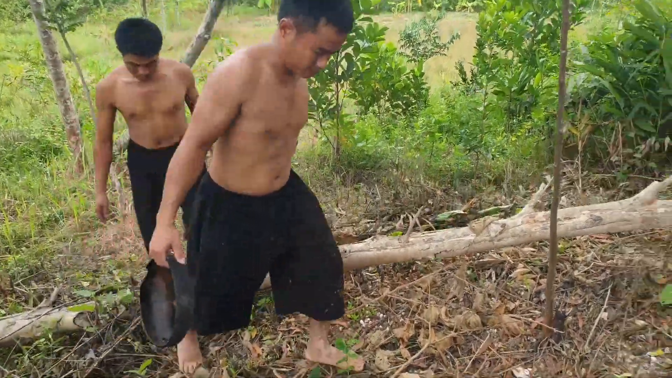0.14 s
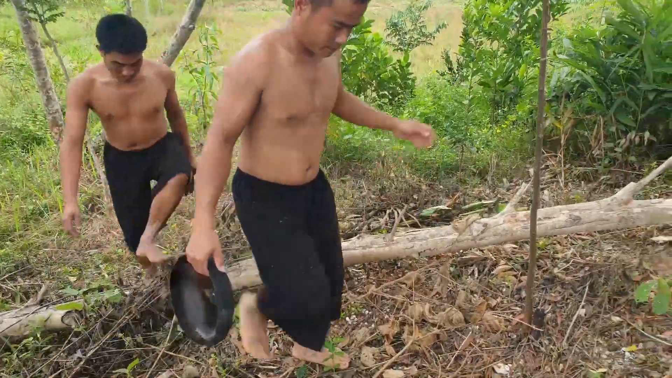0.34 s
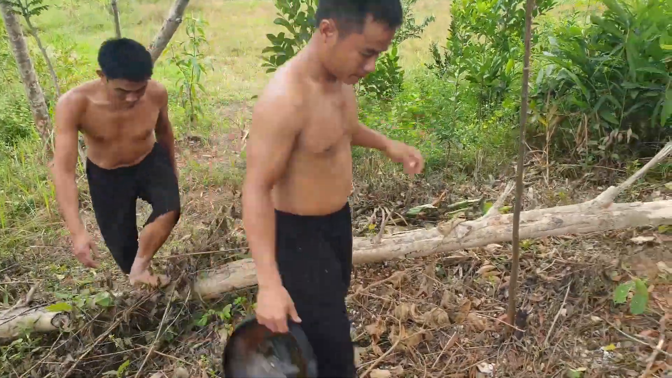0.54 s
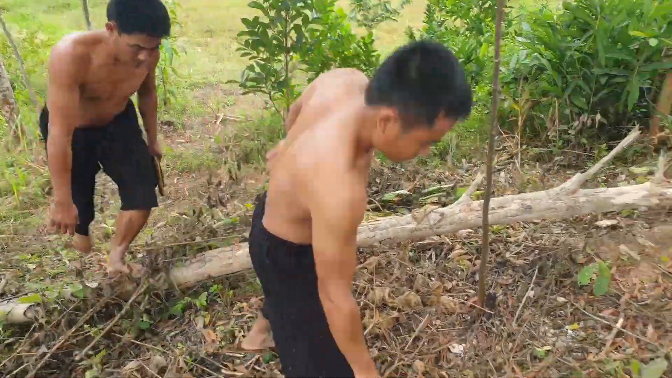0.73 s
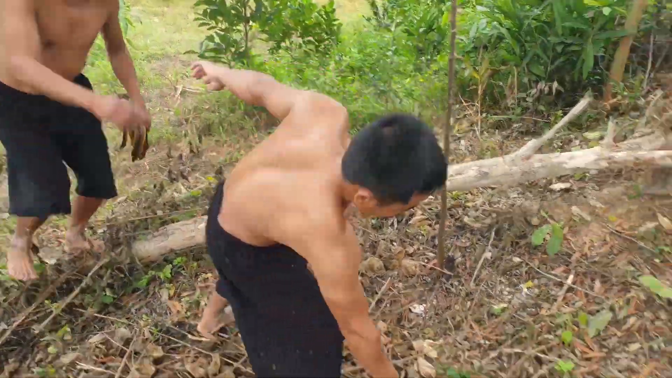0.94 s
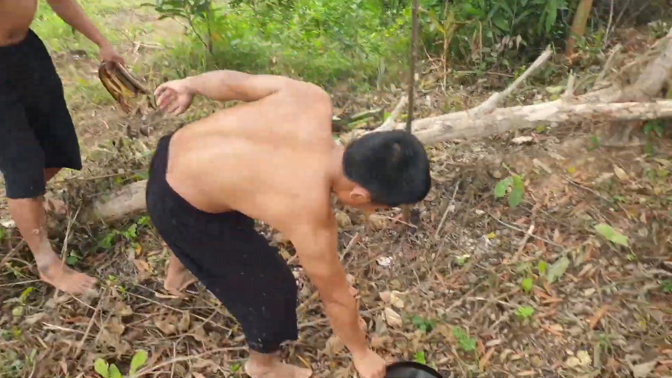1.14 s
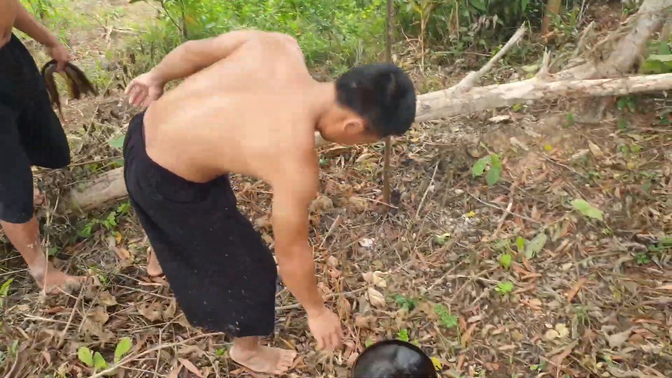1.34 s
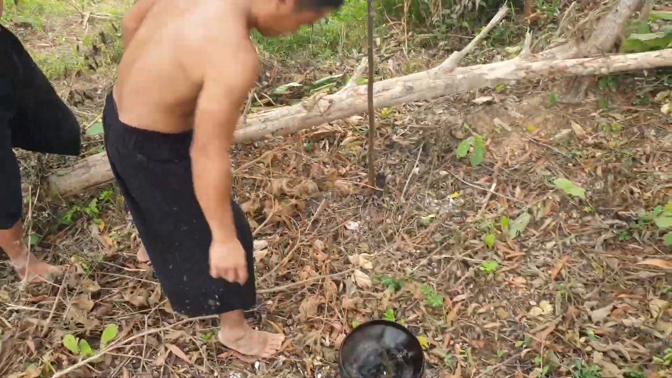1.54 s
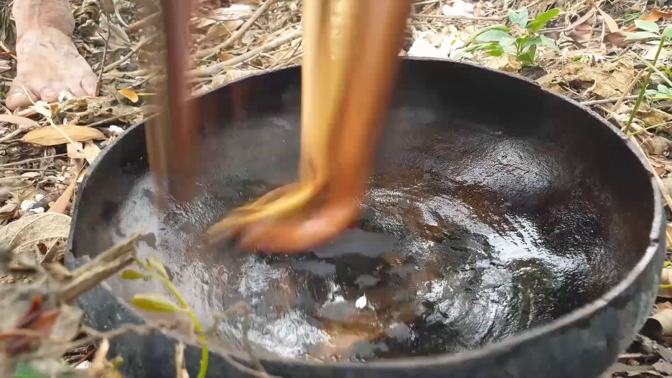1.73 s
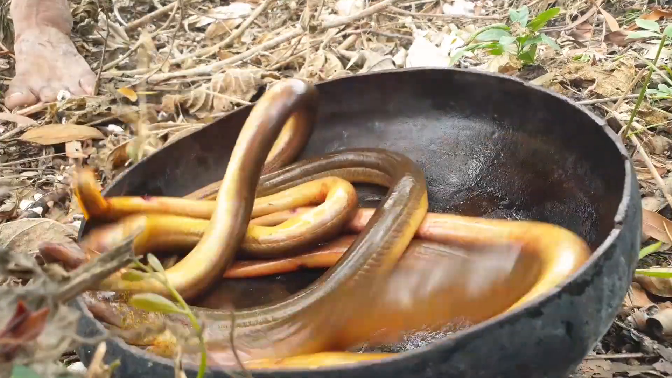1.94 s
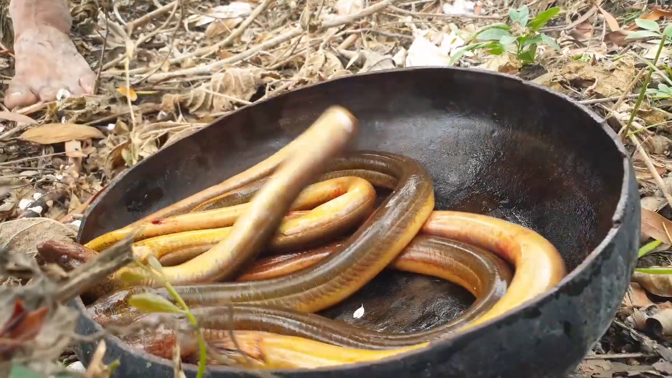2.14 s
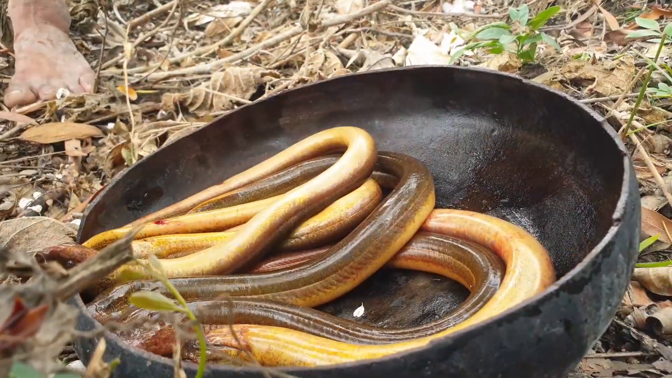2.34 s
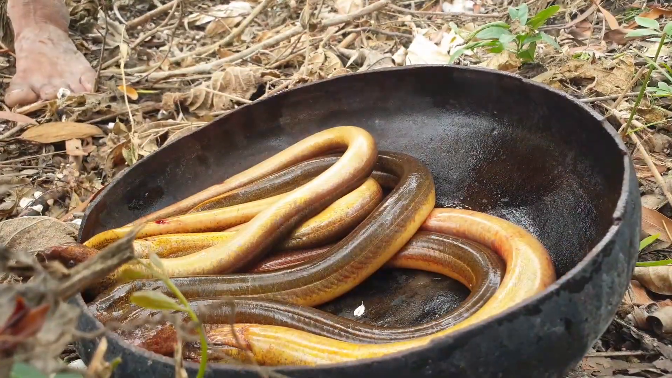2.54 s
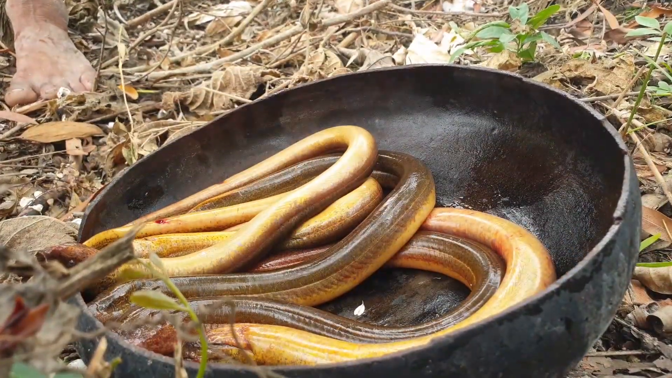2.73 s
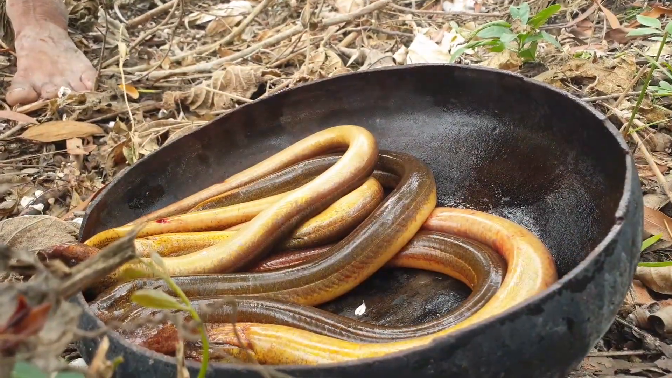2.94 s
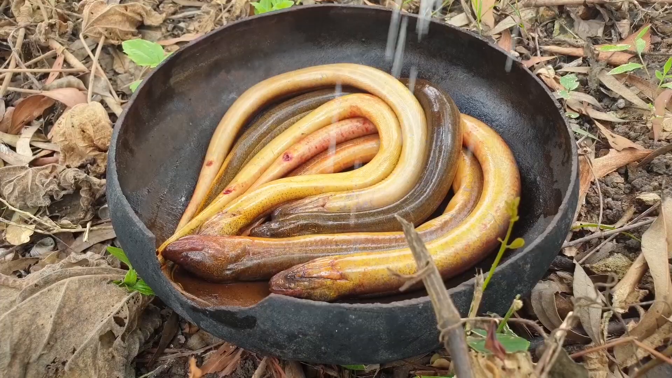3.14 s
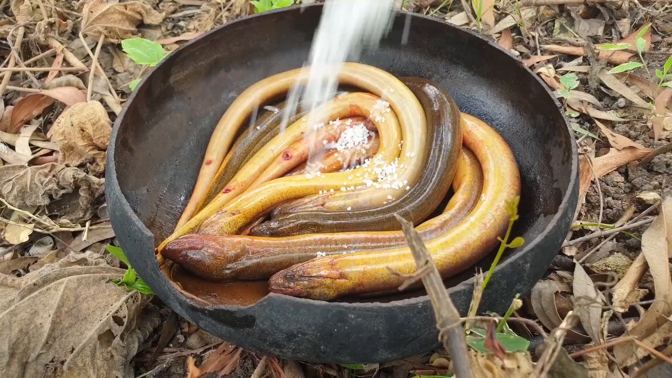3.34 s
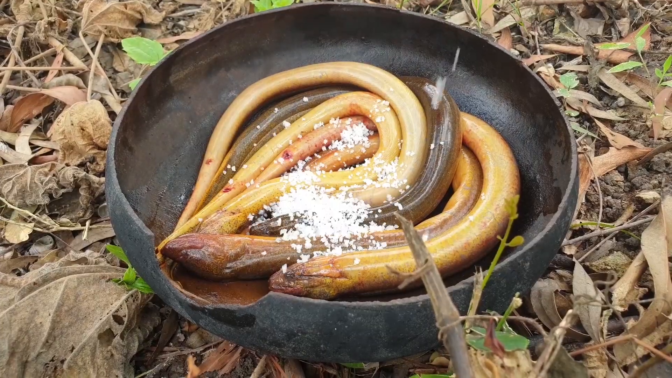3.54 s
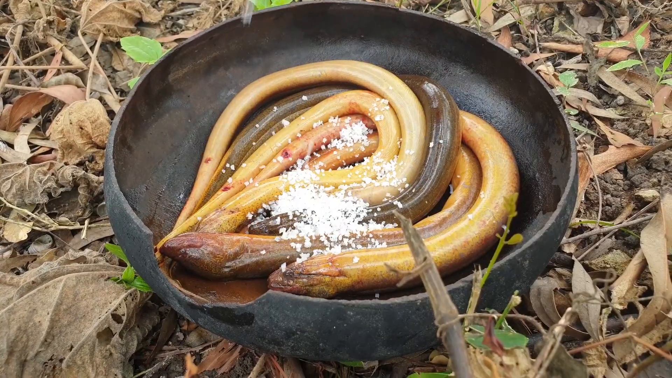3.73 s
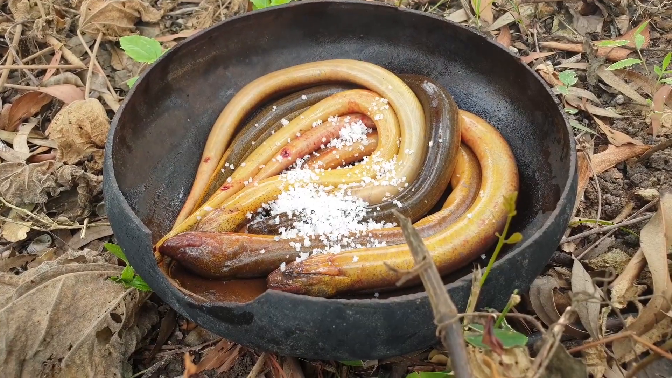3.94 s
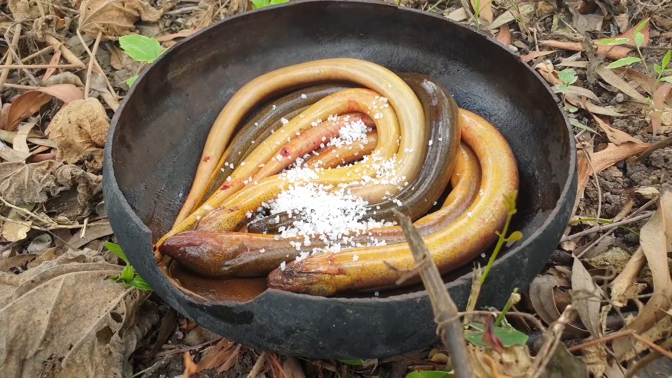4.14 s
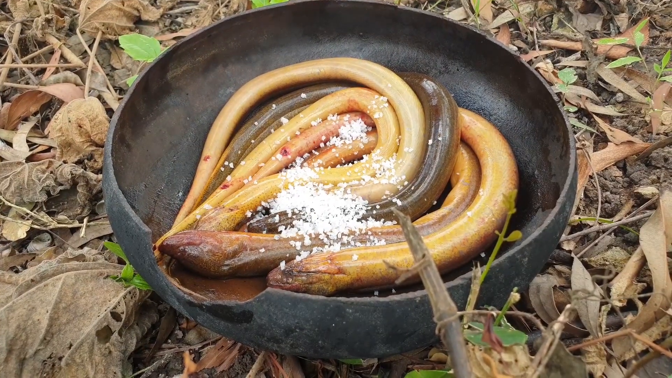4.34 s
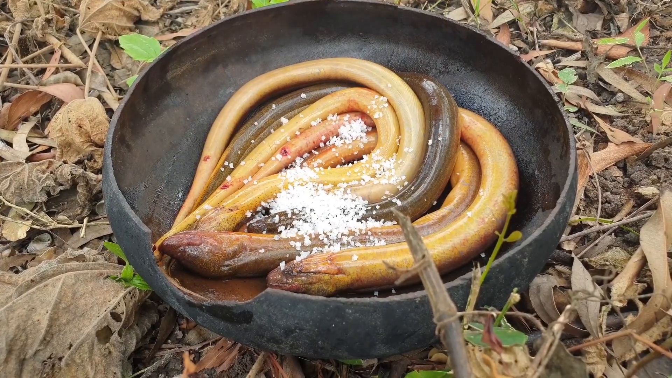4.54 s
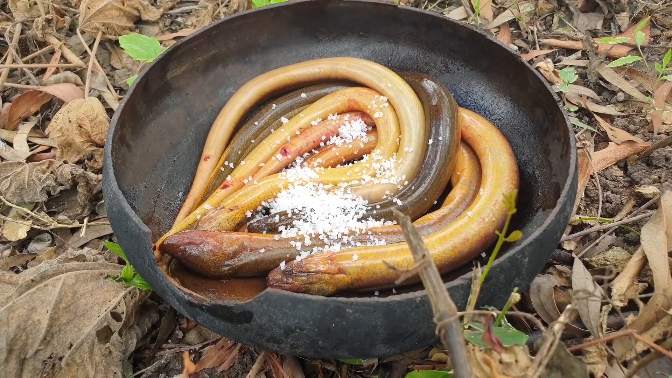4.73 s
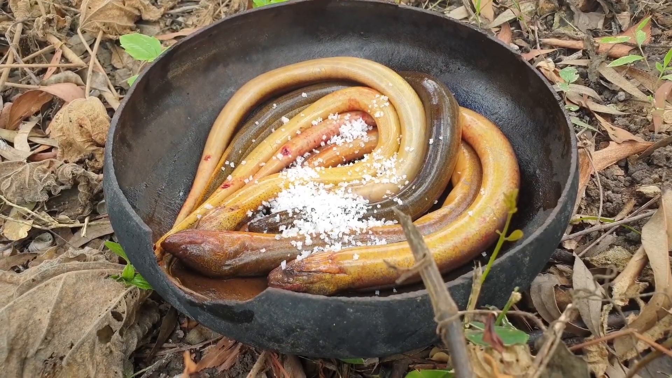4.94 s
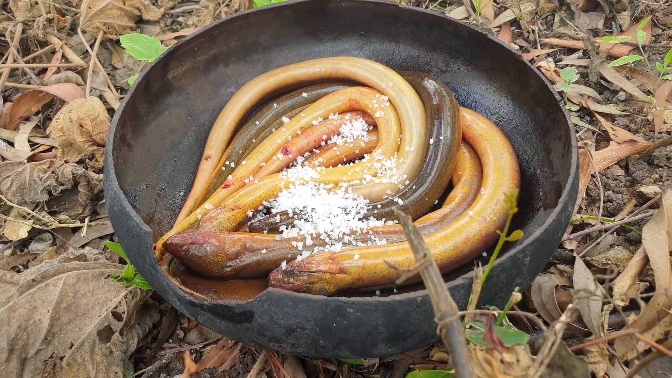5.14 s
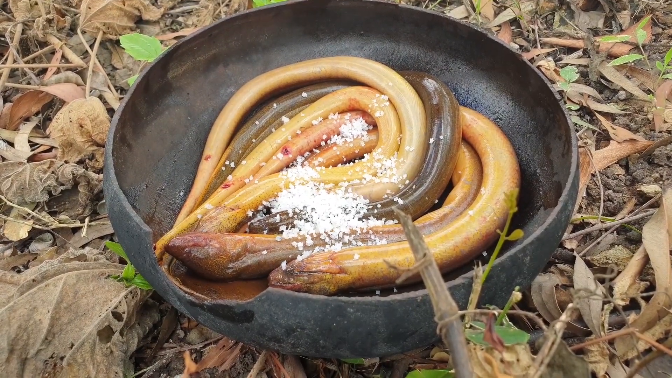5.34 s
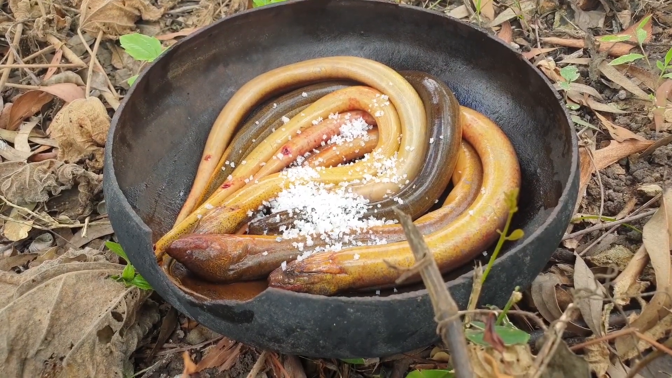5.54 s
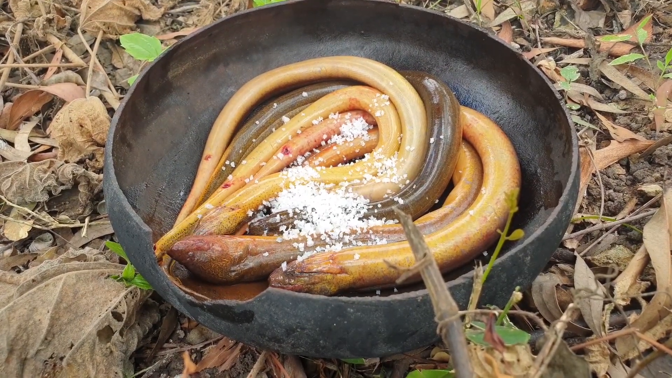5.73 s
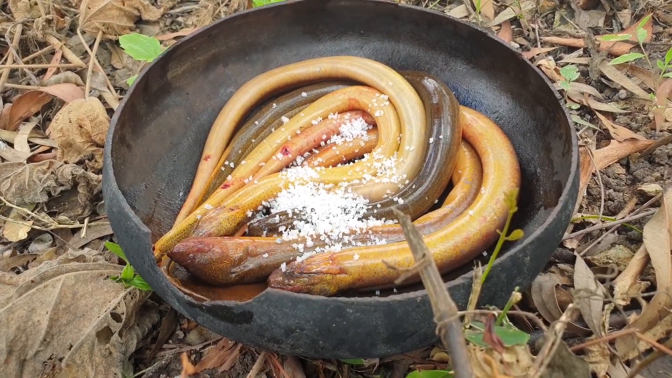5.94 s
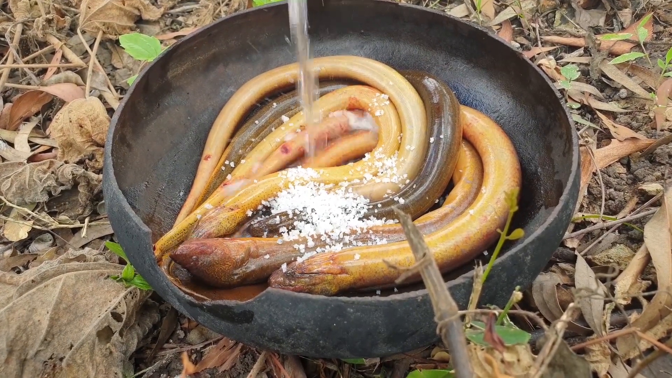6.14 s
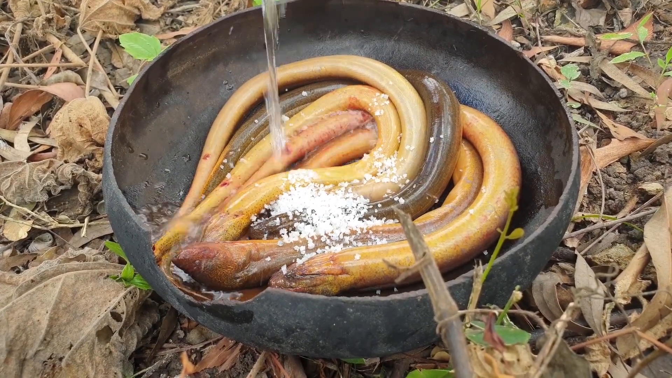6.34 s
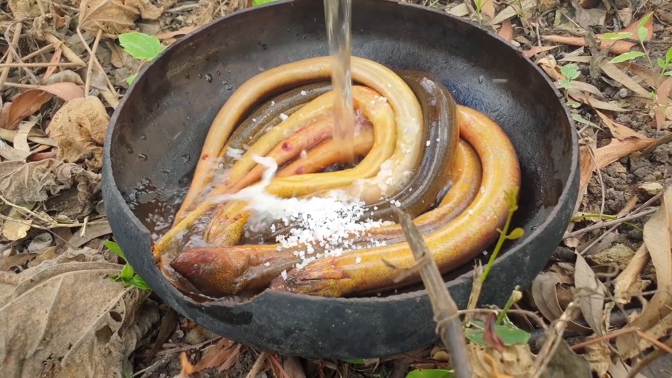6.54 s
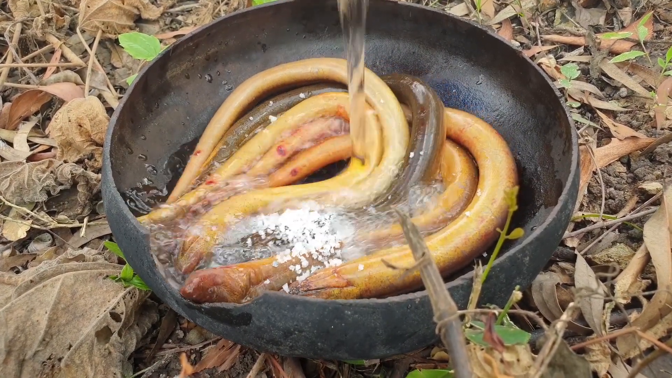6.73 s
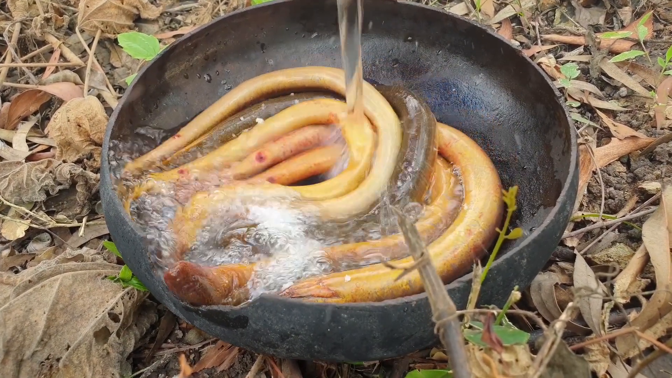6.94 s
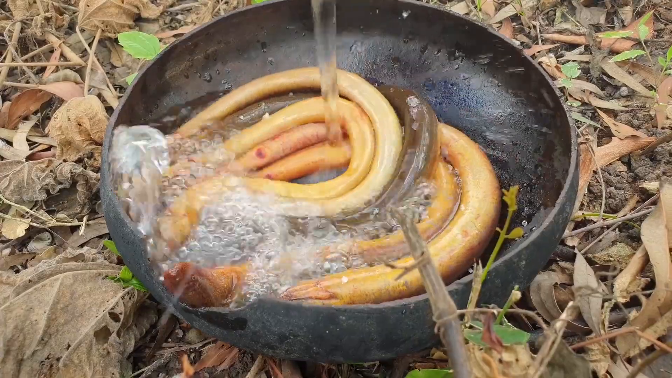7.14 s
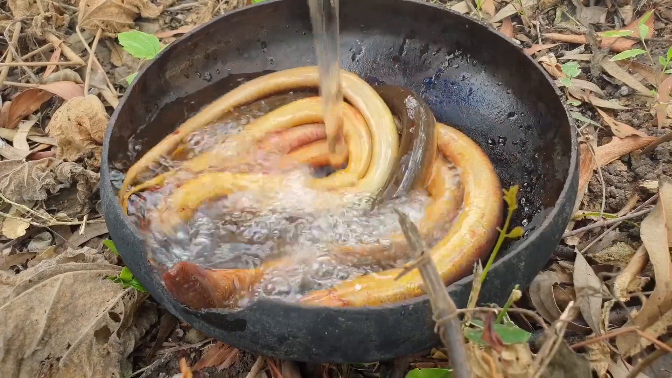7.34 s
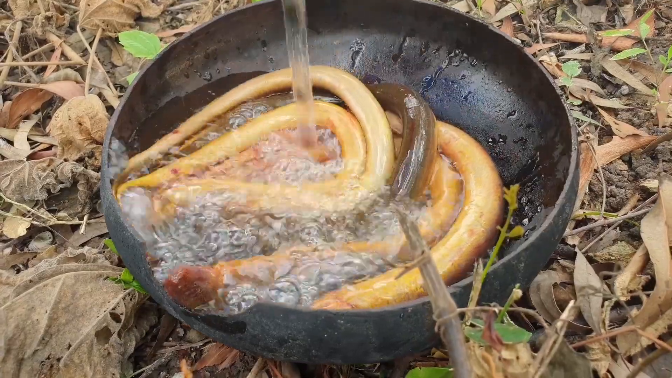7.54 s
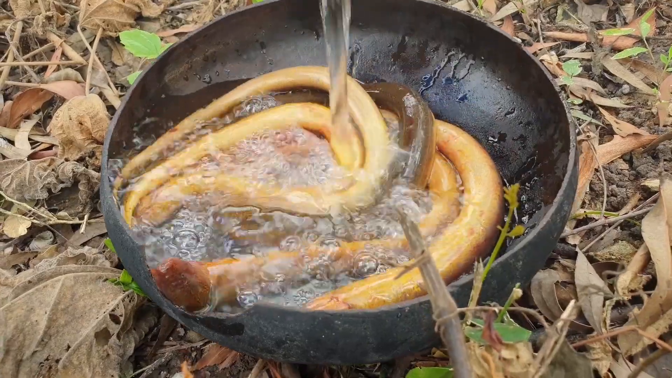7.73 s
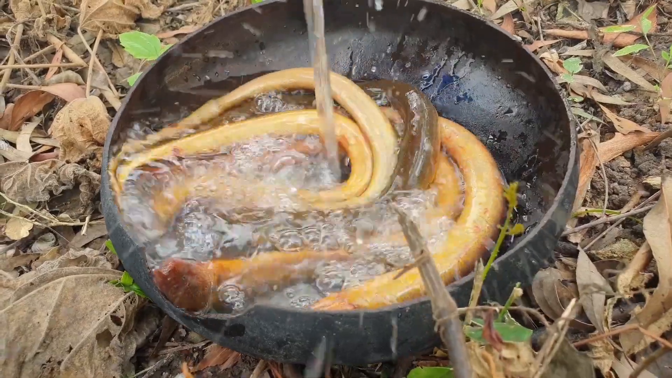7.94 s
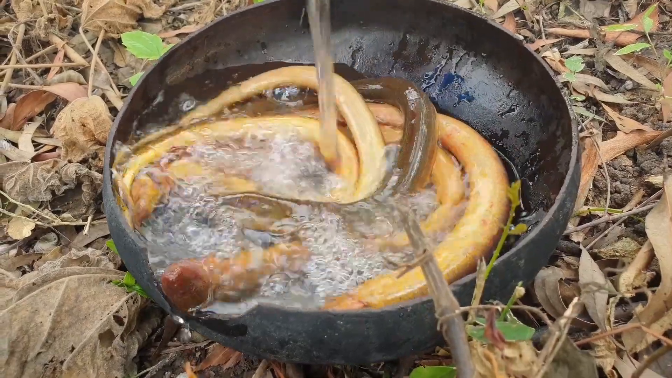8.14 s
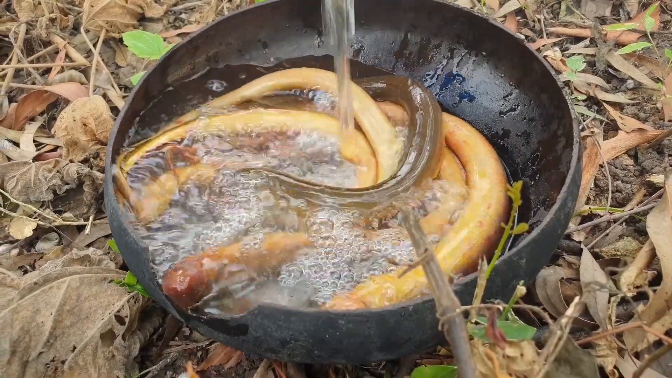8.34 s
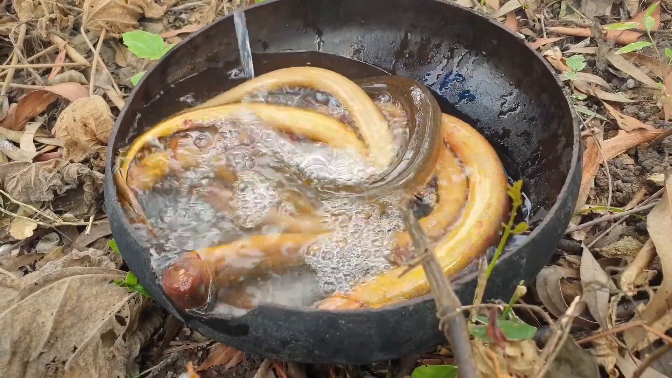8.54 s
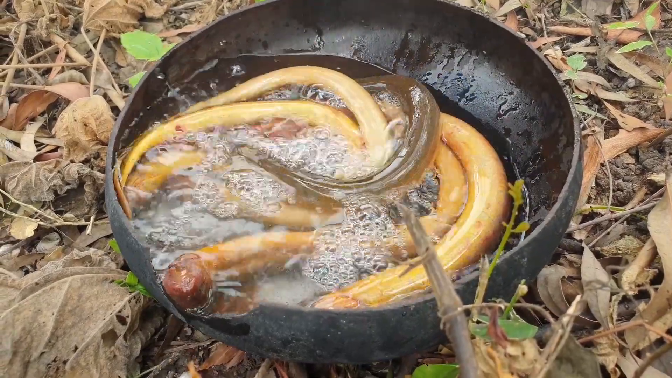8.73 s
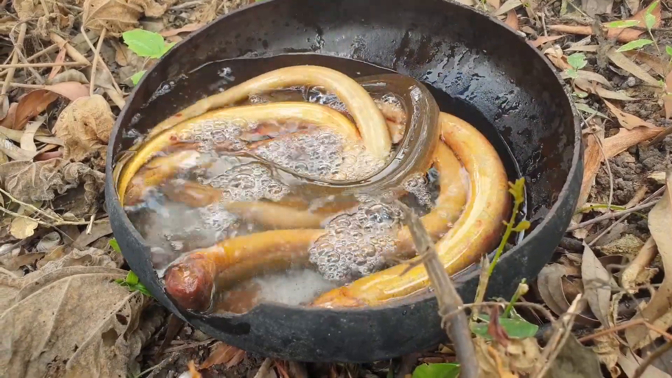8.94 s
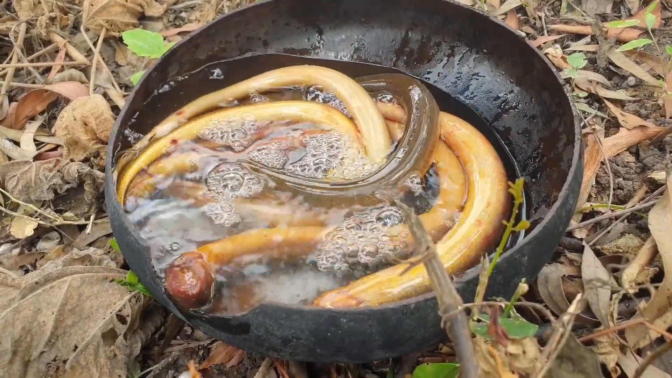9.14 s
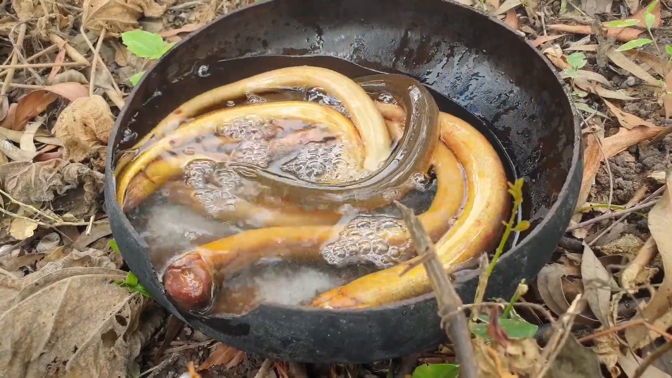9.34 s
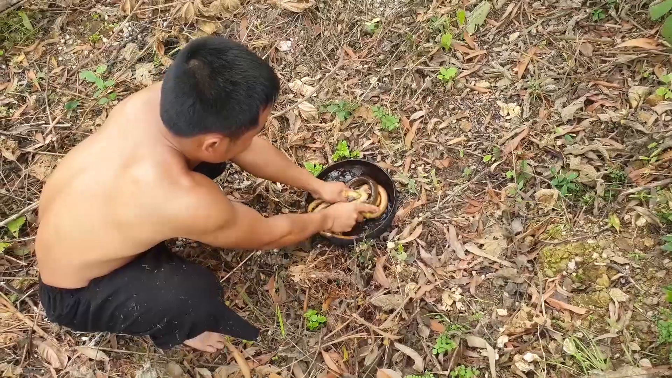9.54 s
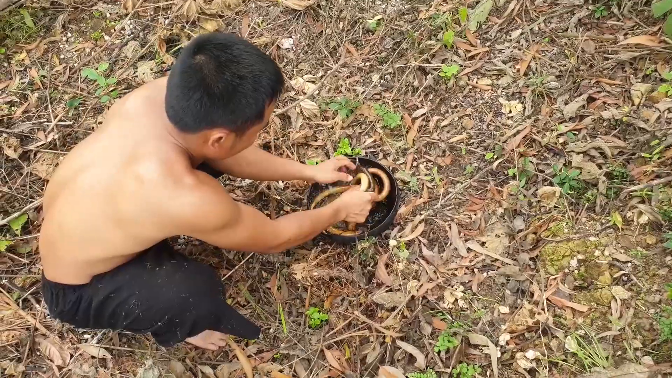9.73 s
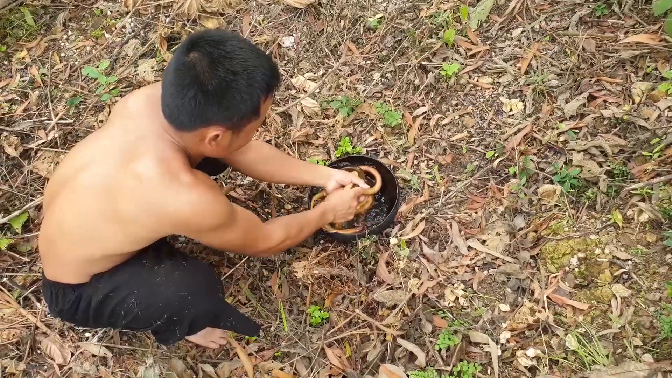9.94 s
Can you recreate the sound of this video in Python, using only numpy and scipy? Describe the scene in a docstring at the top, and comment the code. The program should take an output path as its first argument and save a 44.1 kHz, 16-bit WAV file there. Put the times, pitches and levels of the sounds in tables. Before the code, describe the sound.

Outdoors, leaf crunching gives way to a wet slap of eels in a pan, sprinkled salt, a bubbling splashy pour, fizzing foam and washing.

```python
"""Outdoors on dry leaves, at two microphones close to bare feet and an iron pan, in a low rumble of moving air.
The feet rustle and snap leaves and twigs: showers of filtered noise cracks. Wet eels slap into the pan and
slither: damped sines for trapped air and iron, cracks for wet skin. Salt patters as brighter cracks.
Water pours in as spray and swarms of bubbles, its foam fizzes, a thump sounds, and hands begin to slosh.
Insects shrill faintly and something hoots far off, both as bands of noise."""
import sys
import numpy as np
from scipy import signal
from scipy.fft import rfft, irfft
from scipy.io import wavfile

SR = 44100
rng = np.random.default_rng(int(sys.argv[2]) if len(sys.argv) > 2 else 0)


def file_out(sig):
    """Save sig as 16-bit WAV at sys.argv[1]."""
    # one column per channel
    cols = np.atleast_2d(sig).T
    # limit, then scale
    lim = np.clip(cols, -1, 1)
    pcm = np.round(lim * 32767).astype(np.int16)
    wavfile.write(sys.argv[1], SR, pcm)


N = 439677


def from_db(db):
    """Decibels to gain."""
    return 10 ** (np.asarray(db) / 20)


def level(rows):
    """Gain over time from a curve of (s, dB)."""
    return from_db(np.interp(np.arange(N) / SR, *np.transpose(rows)))


def swell(s, db, length, attack_s, fade_db_per_s):
    """Gain over time of one action: it rises, holds until its length is over, then dies away."""
    t = np.arange(N) / SR - s
    fade_db = np.clip(fade_db_per_s * (t - length), 0, 200)
    return np.clip(t / attack_s, 0, 1) * from_db(db - fade_db)


def swells(rows, attack_s, fade_db_per_s):
    """Several actions of one kind, added in power."""
    return np.sqrt(sum(swell(*row, attack_s, fade_db_per_s) ** 2 for row in rows))


def unit(x):
    """Scale a stereo pair so that its middle has rms 1."""
    return x / np.sqrt(np.mean(x.mean(0) ** 2) + 1e-20)


def tilt(left_db):
    """Gains that raise the left microphone and lower the right by the same dB."""
    return from_db([[left_db], [-left_db]])


def cut(x, hz, kind):
    """Second-order low- or high-pass."""
    return signal.sosfilt(signal.butter(2, min(hz, SR / 2 - 1), kind, fs=SR, output="sos"), x + 1e-18)


def band(low_hz, high_hz):
    """Steep-edged band of stereo noise."""
    edges = signal.butter(4, [low_hz, high_hz], "band", fs=SR, output="sos")
    return unit(signal.sosfilt(edges, rng.standard_normal((2, N))))


def colour(x, points, size=4096):
    """Causal, minimum-phase filter that follows (Hz, dB) points."""
    hz, db = np.transpose(points)
    grid = np.maximum(np.fft.rfftfreq(size, 1 / SR), 1)
    cepstrum = irfft(np.log(from_db(np.interp(np.log(grid), np.log(hz), db))))
    # folding the cepstrum forward makes the phase minimal
    cepstrum[1:size // 2] *= 2
    cepstrum[size // 2 + 1:] = 0
    response = irfft(np.exp(rfft(cepstrum)))
    return signal.oaconvolve(x, response[None])[:, :x.shape[1]]


def add(out, s, sound):
    """Mix a short stereo sound in at time s."""
    at = max(round(s * SR), 0)
    part = out[:, at:at + sound.shape[1]]
    part += sound[:, :part.shape[1]]


def crack(t60, tail_db, size=2048):
    """A tiny noise burst and its scatter off nearby things; both microphones share only the lows."""
    t = np.arange(size) / SR
    burst = from_db(-60 * t / t60)
    scatter = from_db(tail_db - 60 * t / .035)
    onset = 1 - np.exp(-t / .0004)
    mid, side = rng.standard_normal((2, size)) * (burst + scatter) * onset
    return mid + cut(side, 1400, "high") * [[1], [-1]]


def chance(rate, spread_db, clump_db=5.0):
    """Random clicks (sample, size): either sign, uneven sizes that also swell and sink together."""
    at = np.flatnonzero(rng.random(N) < rate / SR)
    step = SR // 70
    clumps = clump_db * np.interp(at, np.arange(0, N, step), rng.uniform(-1, 1, N // step + 1))
    spread = spread_db * np.minimum(rng.exponential(1, len(at)), 4)
    return at, from_db(clumps + spread) * rng.choice([-1, 1], len(at))


def grains(gain, rate, spread_db, t60, tone, tail_db=-15, clump_db=3.0, count=14):
    """A shower of tiny cracks of several kinds, rate per second, under a level curve."""
    at, sizes = chance(rate, spread_db, clump_db)
    out = np.zeros((2, N))
    for k in range(count):
        clicks = np.zeros((1, N))
        clicks[0, at[k::count]] = sizes[k::count]
        out += signal.oaconvolve(clicks, crack(t60, tail_db), axes=1)[:, :N]
    return gain * unit(colour(out, tone))


def hits(rows, t60, tail_db, tone):
    """Single cracks from rows (s, peak dB of their middle)."""
    out = np.zeros((2, N))
    for s, db in rows:
        sound = colour(crack(t60, tail_db), tone)
        add(out, s, sound / np.abs(sound.mean(0)).max() * from_db(db))
    return out


def bubble(hz, t60, rise, lag=0):
    """A damped sine whose pitch may climb as the bubble nears the surface; lag in s between microphones."""
    delays = np.array([[max(lag, 0)], [max(-lag, 0)]])
    t = np.maximum(np.arange(int(t60 * SR) + 2) / SR - delays, 0)
    tone = np.sin(2 * np.pi * hz * t * (1 + rise * t / t60 / 2))
    return tone * from_db(-60 * t / t60) * (1 - np.exp(-2 * hz * t))


# Bubbles born together are alike: how long a cloud lasts in seconds, and its share of the pitch range.
CLOUD_S, CLOUD_WIDTH = .028, 0.19


def bubbles(gain, rate, spread_db, low_hz, high_hz, cycles, rise, together=0):
    """A swarm of bubbles between two pitches; the lower may move with time; a share comes in like clouds."""
    live = gain > from_db(-120)
    at, sizes = chance(rate * live, spread_db)
    out, low_hz, clouds = np.zeros((2, N)), low_hz * np.ones(N), rng.random(N)
    for i, size, (pitch, life, place, company) in zip(at, sizes, rng.random((len(at), 4))):
        if company < together:
            pitch = clouds[int(i / SR / CLOUD_S)] + CLOUD_WIDTH * (pitch - .5)
        hz = low_hz[i] * (high_hz / low_hz[i]) ** pitch
        # in shallow water the large bubbles are damped in fewer cycles
        t60 = cycles * (.5 + life) * np.sqrt(hz / high_hz) / hz
        add(out, i / SR, size * bubble(hz, t60, rise, (place - .5) * 0.00023))
    # a swarm that lives only briefly still keeps its level while it lives
    return gain * unit(out) * np.sqrt(live.mean())


# How the pan lies across the two microphones. Each row: frequency in Hz, left-right dB at a share of 1.
PAN_SIDE = [(250, -2), (1200, 5.5), (2600, 0.5), (4200, -5.5), (5500, -13), (7500, -1), (9500, 9.5),
            (13000, 0)]


def from_pan(x, share):
    """Sound from the pan favours one microphone or the other, band by band, at the same total power."""
    ears = []
    for sign in (-1, 1):
        power = [2 / (1 + from_db(sign * share * db) ** 2) for _, db in PAN_SIDE]
        ears.append([(hz, 10 * np.log10(p)) for (hz, _), p in zip(PAN_SIDE, power)])
    return np.vstack([colour(ear[None], points) for ear, points in zip(x, ears)])


# The moving air. Each row: time in seconds, rumble level in dB.
RUMBLE = [(0, -65), (0.65, -53), (1.6, -56.5), (2.0, -46), (2.8, -54), (3.4, -48.5), (6.15, -46),
          (6.6, -56.5), (8.9, -51.5), (9.97, -57.5)]
# Colours of the rumble and of the hiss. Each row: frequency in Hz, relative level in dB.
AIR_TONE = [(22, -31), (54, -2), (155, -2), (340, -27.5), (800, -62)]
HISS_TONE = [(300, 1), (1000, -12.5), (3900, -8.5), (4600, -1.5), (16000, -2.5)]


def air():
    """Moving air is low noise, nearly alike at both microphones; a faint hiss lies on it."""
    mid, side = rng.standard_normal((2, 1, N))
    apart = colour(side, [(70, -12.5), (140, -15.0)]) * [[1], [-1]]
    rumble = unit(colour(mid + apart, AIR_TONE))
    hiss = unit(colour(rng.standard_normal((2, N)), HISS_TONE))
    return level(RUMBLE) * rumble + from_db(-64.0) * hiss


# A foot presses or brushes the litter. Each row: start in seconds, rustle level in dB, length in seconds.
FOOTFALLS = [(.05, -45, 0.017), (.17, -50.5, 0.079), (.45, -43, 0.043), (.59, -32.5, 0.026),
             (.69, -45, 0.12), (1.09, -42.5, 0.089), (1.2, -42.5, 0.04), (1.5, -43.5, 0.031)]
# Leaves stir between the footfalls: start in seconds, level in dB, length in seconds.
SHUFFLE = (0, -53.5, 1.9)
FOOT_ATTACK_S, SHUFFLE_ATTACK_S, FOOT_FADE_DB_PER_S = 0.018, 0.66, 135
# Dry twigs and leaves snap. Each row: time in seconds, peak dB before the bass is cut.
SNAPS = [(.628, -23), (.6554, -6.5), (.7841, -19.5), (1.314, -21), (1.507, -14.5)]
# Stiff leaves give way under a heel. Each row: time in seconds, peak dB before the treble is cut.
CRUNCHES = [(.841, -24.5), (1.12, -21)]
# Colour of dry leaves. Each row: frequency in Hz, relative level in dB.
LEAF_TONE = [(300, -10.5), (1060, -6), (15000, -1.5)]


def footsteps():
    """Leaves brush and crackle in many tiny cracks and thin twigs snap brightly, a little to the left."""
    shuffle = swell(*SHUFFLE, SHUFFLE_ATTACK_S, FOOT_FADE_DB_PER_S)
    tread = np.hypot(swells(FOOTFALLS, FOOT_ATTACK_S, FOOT_FADE_DB_PER_S), shuffle)
    rustle = grains(tread, rate=3000, spread_db=4.0, t60=0.002, tone=LEAF_TONE, clump_db=4.5)
    crackle = grains(tread * from_db(-4.5), rate=80, spread_db=4.5, t60=0.0018, tone=LEAF_TONE)
    snaps = cut(hits(SNAPS, t60=0.0019, tail_db=-25, tone=LEAF_TONE), 4600, "high")
    crunches = cut(hits(CRUNCHES, t60=0.013, tail_db=-15, tone=LEAF_TONE), 2700, "low")
    return (rustle + crackle + snaps + crunches) * tilt(1)


# Drops and salt grains tick in the pan. Each row: time in seconds, peak dB of the click,
# peak dB of its ring before the ring is spread across the microphones.
TICKS = [(1.7512, -7.5, -21), (1.8066, -15, -36), (1.8294, -15.5, -21.5), (2.9825, -20, -42),
         (4.03, -36, -21.5), (4.114, -25, -17.5), (4.135, -21, -18), (4.179, -17, -25),
         (5.38, -13.5, -24.5), (5.444, -29, -34), (5.458, -28.5, -27), (5.489, -15, -29),
         (5.5885, -18.5, -26), (5.9435, -29, -22)]
# Wet skin, then stray salt grains, tick faintly. Each row: start in seconds, level in dB, length in seconds.
STRAYS = [(2.5, -63.5, 0.78), (3.6, -58, 0.92)]
# Colours of the click and of the ring. Each row: frequency in Hz, relative level in dB.
TICK_TONE = [(1300, -28), (3200, -8), (7000, -4), (11000, 1)]
RING_TONE = [(3200, -23.5), (5000, 0), (6500, -1.5), (8500, -17), (15000, -19)]
SALT_ATTACK_S, SALT_FADE_DB_PER_S = 0.003, 48


def ticks():
    """Lone drops and the largest grains strike a bright click and short ring; tiny ones tick in between."""
    click = hits([(s, db) for s, db, _ in TICKS], t60=0.0021, tail_db=-26.5, tone=TICK_TONE)
    ring = hits([(s, db) for s, _, db in TICKS], t60=0.0014, tail_db=-26, tone=RING_TONE)
    straying = swells(STRAYS, SALT_ATTACK_S, SALT_FADE_DB_PER_S)
    strays = grains(straying, rate=26, spread_db=3.5, t60=0.0015, tone=TICK_TONE, tail_db=-31)
    return click + from_pan(ring, share=0.82) + strays


# Eels land. Each row: time in seconds, nominal level of pop and thud in dB,
# pitch of the trapped air in Hz, splatter peak in dB.
SLAPS = [(1.8523, -14.5, 951, -21), (1.858, -6.5, 543, -36), (1.8615, -29, 198, -6.5),
         (1.8713, -11.5, 600, -37), (1.8788, -3.5, 1080, -8.5), (1.905, -9, 780, -21.5)]
# The first tails, then the heap, come down. Each row: start in seconds, nominal level in dB, length in seconds.
LANDINGS = [(1.83, -26, 0.035), (1.858, -20.5, 0.04)]
# They slide to rest: start in seconds, level in dB, length in seconds.
SLIDE = (1.886, -51.5, 0.48)
EEL_ATTACK_S, LANDING_FADE_DB_PER_S, SLIDE_FADE_DB_PER_S = 0.022, 237, 259.5
# Modes of the loaded pan. Each row: frequency in Hz, relative level in dB.
PAN_MODES = [(135, -11), (290, -12), (500, -16), (670, -9), (1100, -14)]
# Colour of wet skin. Each row: frequency in Hz, relative level in dB.
SKIN_TONE = [(250, -11), (1800, -6), (11000, -1)]


def eels():
    """Each landing squeezes out a pop of air, splatters and thuds the pan; wet skin squelches and slides."""
    pops, thuds, t = np.zeros((2, N)), np.zeros((2, N)), np.arange(SR // 4) / SR
    # the soft load damps the iron almost at once
    ring = sum(from_db(db - 60 * t / .05) * np.sin(2 * np.pi * hz * t) for hz, db in PAN_MODES)
    for s, db, hz, _ in SLAPS:
        add(pops, s, from_db(db + 3) * bubble(hz, 6 / hz, rise=.2))
        add(thuds, s, from_db(db - 3) * np.array([ring, ring]))
    splatter = hits([(row[0], row[3]) for row in SLAPS], t60=0.028, tail_db=-25.5, tone=SKIN_TONE)
    landing = swells(LANDINGS, EEL_ATTACK_S, LANDING_FADE_DB_PER_S)
    sliding = np.hypot(landing * .5, swell(*SLIDE, EEL_ATTACK_S, SLIDE_FADE_DB_PER_S))
    slide = grains(sliding, rate=2600, spread_db=5.5, t60=0.00066, tone=SKIN_TONE)
    squelch = bubbles(landing * 0.52, rate=700, spread_db=4, low_hz=1000, high_hz=3030, cycles=7.4, rise=0.24)
    return cut(pops + thuds + squelch, 150, "high") * tilt(2) + splatter + slide


# A scatter of salt lands. Each row: start in seconds, nominal level in dB, length in seconds.
SPRINKLES = [(3.125, -58, 0.09), (3.22, -46, 0.28), (3.76, -43.5, 0.022), (4.1, -58, 0.25),
             (4.99, -63, 0.097), (5.38, -59, 0.18)]
# Clumps of salt land. Each row: time in seconds, peak dB before the spread across the microphones.
CLUMPS = [(3.219, -32), (3.292, -29.5), (3.364, -24.5), (3.491, -29), (4.142, -26.5)]
# Colours of fine and of coarse salt. Each row: frequency in Hz, relative level in dB.
SALT_TONE = [(700, -18.5), (2800, -17.5), (5200, 2), (6700, 0), (8700, -12), (13100, -6)]
COARSE_TONE = [(350, -11), (1100, -3), (5500, 3), (9000, -6)]


def salt():
    """Fine crystals hiss on skin and iron; coarse ones patter more dully, singly and in clumps."""
    falling = swells(SPRINKLES, SALT_ATTACK_S, SALT_FADE_DB_PER_S)
    fine = grains(falling * from_db(5.0), rate=600, spread_db=4, t60=0.0023, tone=SALT_TONE)
    coarse = grains(falling * from_db(-6.0), rate=120, spread_db=2.5, t60=0.0011, tone=COARSE_TONE)
    return fine + coarse + hits(CLUMPS, t60=0.0073, tail_db=-5, tone=COARSE_TONE)


# Insects shrill in the undergrowth: start in seconds, mean level in dB, length in seconds.
INSECTS = (3.12, -66.5, 7.3)
# Two faint far-off hoots. Each row: start in seconds, level in dB, length in seconds.
HOOTS = [(5.012, -67.5, 0.026), (5.14, -67.5, 0.048)]
WILDLIFE_ATTACK_S, WILDLIFE_FADE_DB_PER_S = 0.017, 302.5


def wildlife():
    """A thin band of insect noise that swells and sinks, and something hooting far away in a lower band."""
    wavering = from_db(np.interp(np.arange(N), np.linspace(0, N, 100), rng.normal(0, 2, 100)))
    shrilling = swell(*INSECTS, WILDLIFE_ATTACK_S, WILDLIFE_FADE_DB_PER_S) * wavering
    hooting = swells(HOOTS, WILDLIFE_ATTACK_S, WILDLIFE_FADE_DB_PER_S)
    return shrilling * band(4480, 6500) + hooting * band(666, 810)


# Air resonances between the eels and the pan wall. Each row: frequency in Hz, boost in dB.
HOLLOWS = [(780, 5), (1700, 7.5), (2300, 9), (2930, 8.5)]
HOLLOW_WIDTH_HZ = 127


def hollows(x):
    """The air in the gaps between eels and pan wall rings along at a few pitches."""
    out = x
    for hz, db in HOLLOWS:
        peak = signal.iirpeak(hz, hz / HOLLOW_WIDTH_HZ, fs=SR)
        out = out + (from_db(db) - 1) * signal.lfilter(*peak, x)
    return out


POUR_START_S, POUR_END_S = 6.078, 8.635
POUR_ATTACK_S, POUR_FADE_DB_PER_S = 0.03, 267
# Strength of the stream's splashing. Each row: time in seconds, spray level in dB.
SPLASHING = [(6.1, -19.5), (6.26, -30.5), (6.41, -28.5), (6.45, -38), (6.53, -28.5), (6.78, -33.5),
             (7.2, -28.5), (7.48, -35.5), (7.84, -32.5), (8.06, -29.5), (8.2, -36), (8.28, -30),
             (8.62, -33)]
# How much air the stream drags under. Each row: time in seconds, level in dB before the hollows ring.
DRAGGED_AIR = [(6.12, -27.5), (6.38, -42), (6.59, -33.5), (7.5, -33.5), (8.03, -29), (8.3, -31), (8.6, -31)]
# The stream drums in a narrow gap between the eels. Each row: start in seconds, nominal level in dB,
# length in seconds, middle pitch in Hz.
DRUMMING = [(6.221, -40.5, 0.16, 1116), (7.219, -39.5, 0.16, 1670)]
DRUM_SPREAD = 1.1   # pitch ratio either side
# Lumps of the stream hit. Each row: time in seconds, peak dB before the spread across the microphones.
SPATS = [(6.1005, -8), (6.2252, -9.5), (6.4215, -10), (6.462, -12), (6.5355, -8.5), (6.9473, -9),
         (7.1598, -22), (7.407, -12), (7.4315, -13), (7.807, -13.5), (7.83, -9.5), (8.479, -14),
         (8.7175, -10.5)]
# Colours of the spray and of the gurgle. Each row: frequency in Hz, gain in dB.
SPRAY_TONE = [(300, -56), (800, -20.5), (2700, -13.5), (5300, 7), (6700, 1.5), (8500, -14), (11500, -8),
              (16000, -15)]
GURGLE_TONE = [(300, -19), (4000, -2)]


def pour():
    """The stream shatters into spray and drags in a froth of air: the deeper the water, the larger the bubbles."""
    running = swell(POUR_START_S, 0, POUR_END_S - POUR_START_S, POUR_ATTACK_S, POUR_FADE_DB_PER_S)
    splashing = running * level(SPLASHING)
    spray = grains(splashing, rate=1400, spread_db=4.0, t60=0.0027, tone=SPRAY_TONE, clump_db=5.5)
    foam = bubbles(splashing * from_db(-6.0), rate=420, spread_db=3.5, low_hz=3616, high_hz=7700,
                   cycles=47, rise=0.056, together=0.53)
    largest_hz = np.interp(np.arange(N) / SR, [6.1, 7.8], [620, 290])
    gurgle = bubbles(running * level(DRAGGED_AIR), rate=2400, spread_db=3.0, low_hz=largest_hz,
                     high_hz=4350, cycles=28, rise=0.08)
    drumming = np.zeros((2, N))
    for s, db, length, hz in DRUMMING:
        beating = swell(s, db, length, POUR_ATTACK_S, POUR_FADE_DB_PER_S)
        drumming += bubbles(beating, rate=900, spread_db=2.5, low_hz=hz / DRUM_SPREAD,
                            high_hz=hz * DRUM_SPREAD, cycles=22, rise=0)
    spats = hits(SPATS, t60=0.0034, tail_db=-15.5, tone=SPRAY_TONE)
    return spray + foam + hollows(colour(gurgle, GURGLE_TONE)) + drumming + spats


# Single large bubbles. Each row: time in seconds, peak dB before the tilt to the left, pitch in Hz.
PLOPS = [(7.435, -24.5, 504), (8.569, -20.5, 2182), (8.741, -32, 1095), (9.629, -31, 2910),
         (9.785, -31.5, 1800)]
PLOP_T60_S = 0.044


def plops():
    """Large pockets of air close one at a time, each a damped sine that climbs."""
    out = np.zeros((2, N))
    for s, db, hz in PLOPS:
        sound = bubble(hz, PLOP_T60_S, rise=0.13)
        add(out, s, from_db(db) * sound / sound.max())
    return out * tilt(1)


# The foam fizzes on, then stops abruptly.
FIZZ_DB, FIZZ_FADE_DB_PER_S, WASH_START_S = -45.5, 12.5, 9.485
# The water laps after the stream stops: start in seconds, nominal level in dB, length in seconds.
LAPPING = (8.66, -57.5, 0.33)
LAPPING_FADE_DB_PER_S = 153.5


def settling_water():
    """After the stream stops the foam fizzes away in tiny cracks and the water laps with a few last bubbles."""
    foam = swell(POUR_END_S, FIZZ_DB, 0, POUR_ATTACK_S, FIZZ_FADE_DB_PER_S)
    foam = foam * (np.arange(N) / SR < WASH_START_S)
    fizz = grains(foam, rate=1600, spread_db=3.5, t60=0.0027, tone=RING_TONE)
    lapping = swell(*LAPPING, POUR_ATTACK_S, LAPPING_FADE_DB_PER_S)
    laps = bubbles(lapping, rate=380, spread_db=2, low_hz=437, high_hz=1710, cycles=12, rise=0.089)
    splash = grains(lapping, rate=400, spread_db=3.0, t60=0.0014, tone=SKIN_TONE)
    return fizz + laps + splash


# A dull low thump: time in seconds, level in dB before damping, pitch in Hz, 60 dB decay in seconds.
THUMP = (8.668, -37, 123, .2)


def thump():
    """One soft low bump as the stream ends, a damped sine of steady pitch."""
    out = np.zeros((2, N))
    s, db, hz, t60 = THUMP
    add(out, s, from_db(db) * bubble(hz, t60, rise=0))
    return out


# A hand sweeps through the water. Each row: start in seconds, nominal level in dB, length in seconds.
STROKES = [(9.485, -48, 0.03), (9.56, -48, 0.043), (9.625, -43.5, 0.038), (9.71, -42.5, 0.083)]
STROKE_ATTACK_S, STROKE_FADE_DB_PER_S = 0.0068, 204


def washing():
    """Hands stir up small bubbles and a light splash, rather to the left."""
    stirring = swells(STROKES, STROKE_ATTACK_S, STROKE_FADE_DB_PER_S)
    swirl = bubbles(stirring, rate=540, spread_db=3.5, low_hz=1170, high_hz=4880,
                    cycles=45, rise=0.11, together=0.39)
    splash_tone = [(500, -24), (900, 3), (6000, 4.5), (12000, -6)]   # Hz, relative dB
    splash = grains(stirring * 0.75, rate=700, spread_db=5.5, t60=0.0021, tone=splash_tone)
    return (swirl + splash) * tilt(2)


def scene():
    """All sources in the open air."""
    ground = air() + footsteps() + wildlife()
    pan = ticks() + eels() + from_pan(salt(), share=0.89)
    water = from_pan(pour() + settling_water(), share=1.14) + plops() + thump() + washing()
    return ground + pan + water


CUTOFF_HZ = 15900


def record(dry):
    """The top is cut steeply."""
    return signal.sosfilt(signal.ellip(10, .2, 80, CUTOFF_HZ, fs=SR, output="sos"), dry)


dry = scene()
out = record(dry)
file_out(out)
```